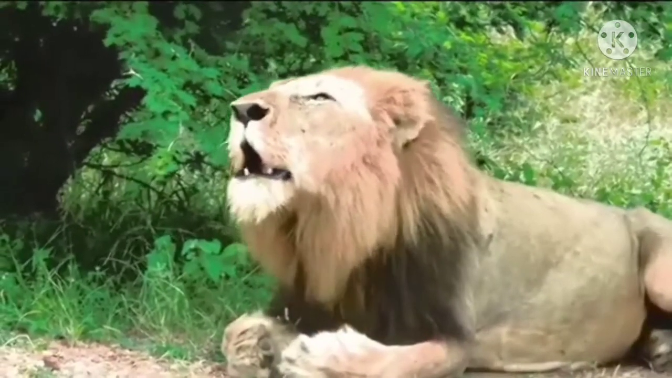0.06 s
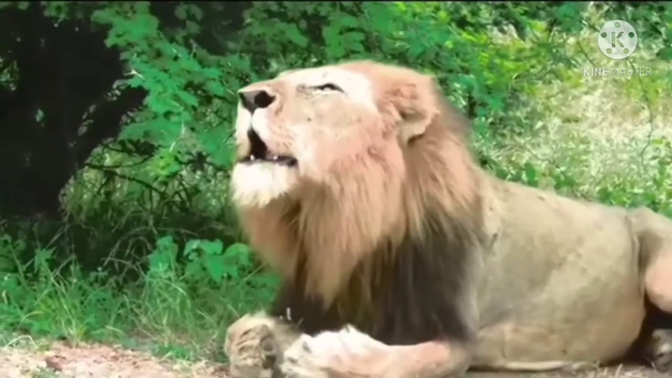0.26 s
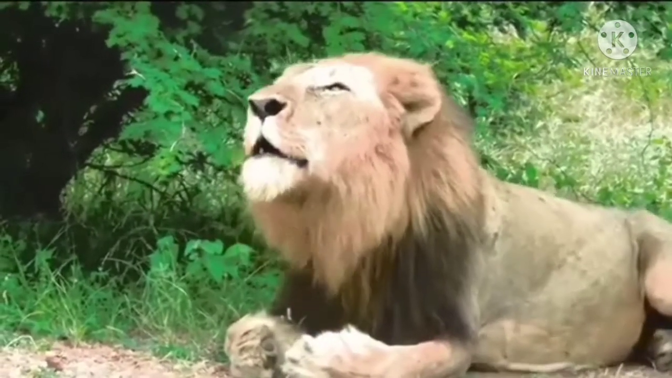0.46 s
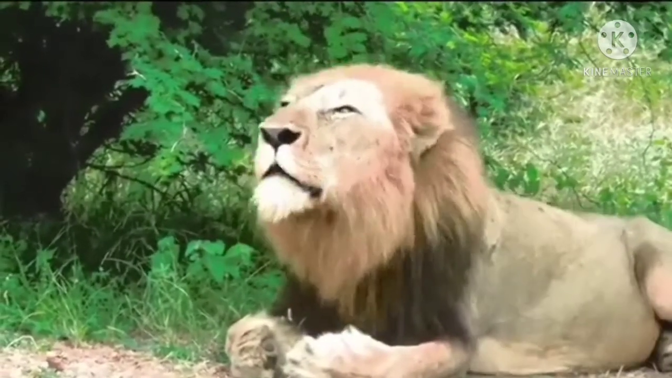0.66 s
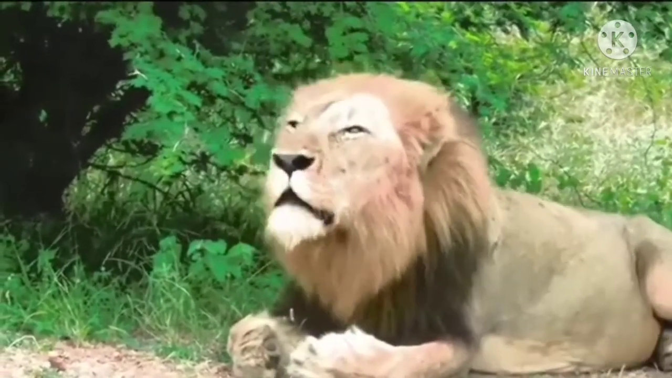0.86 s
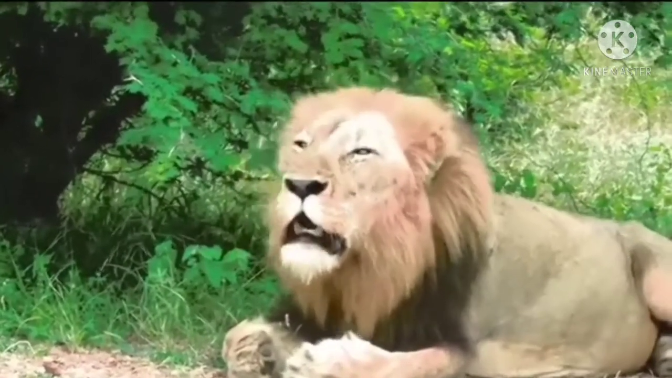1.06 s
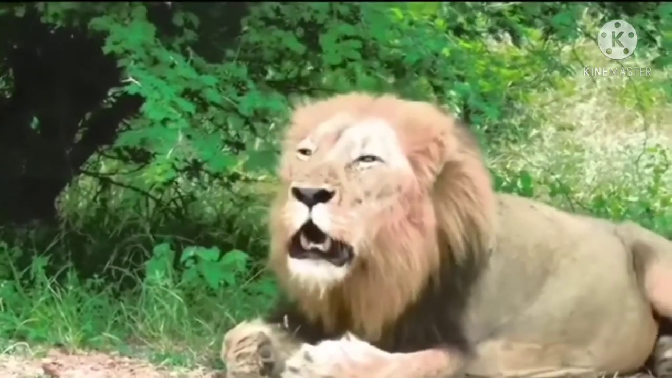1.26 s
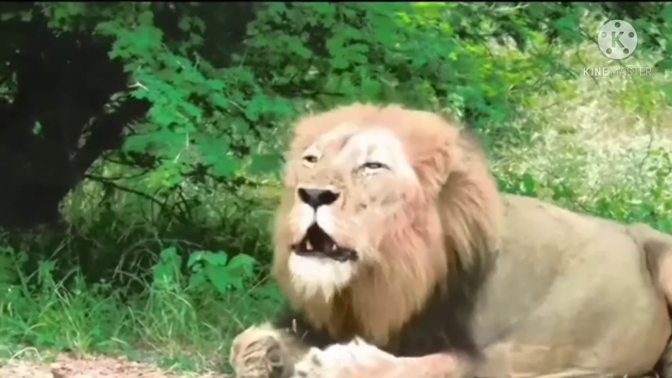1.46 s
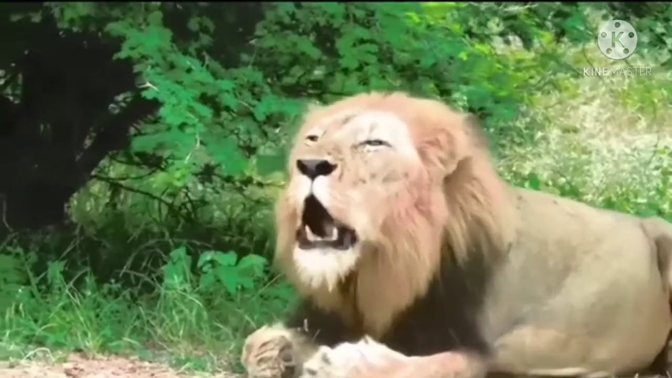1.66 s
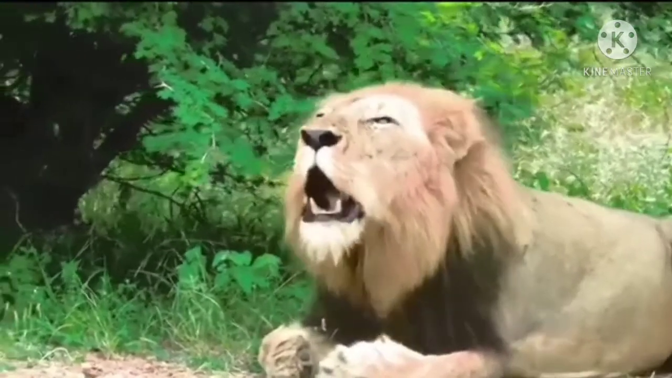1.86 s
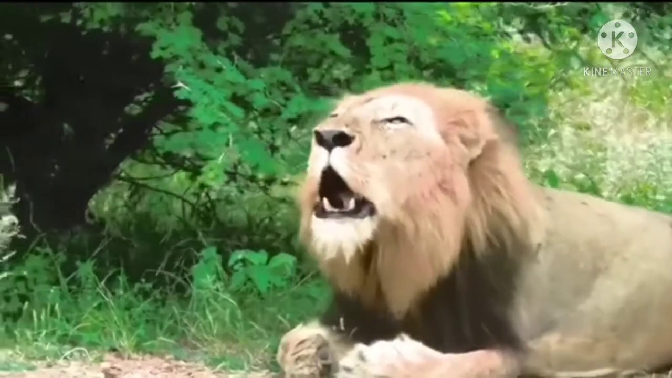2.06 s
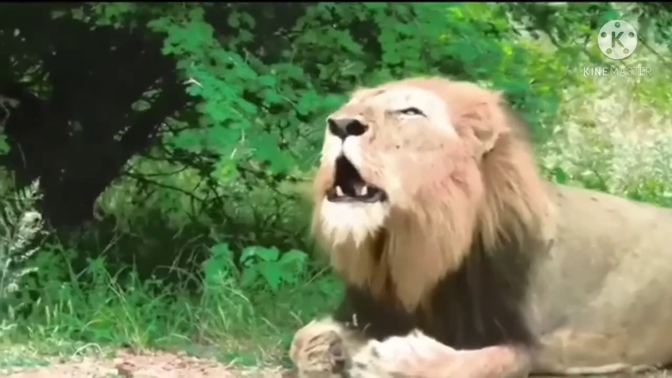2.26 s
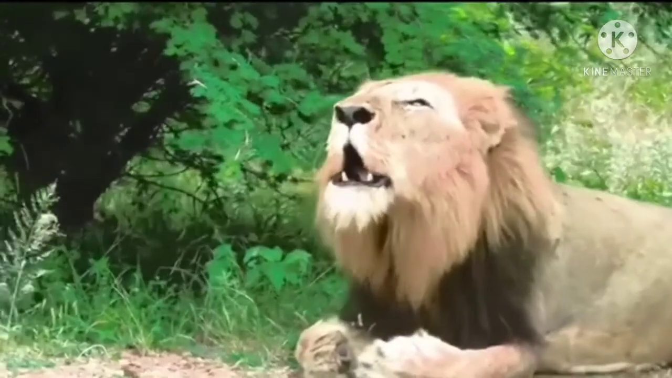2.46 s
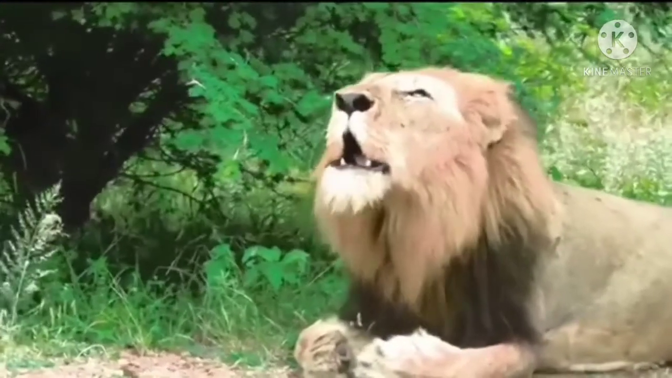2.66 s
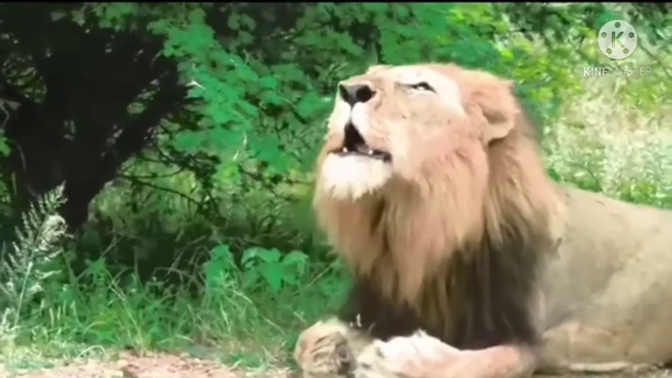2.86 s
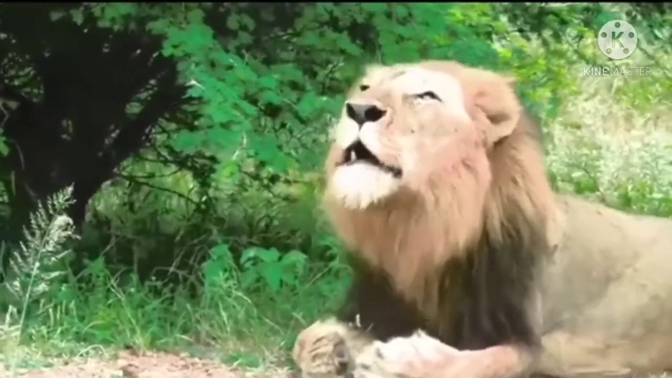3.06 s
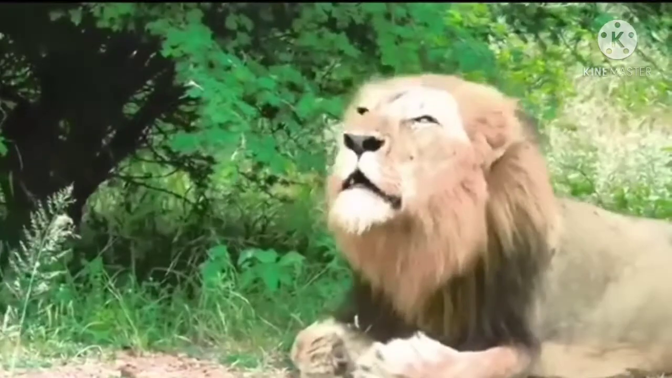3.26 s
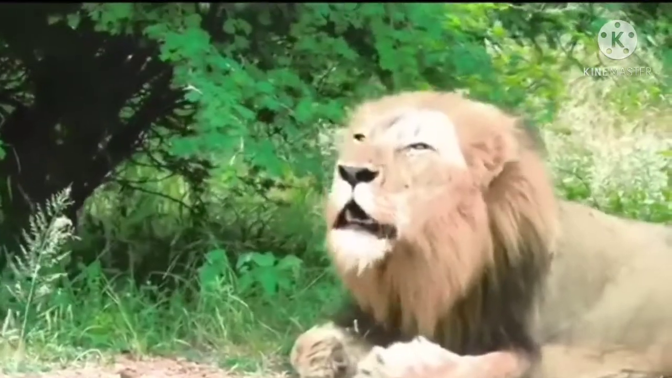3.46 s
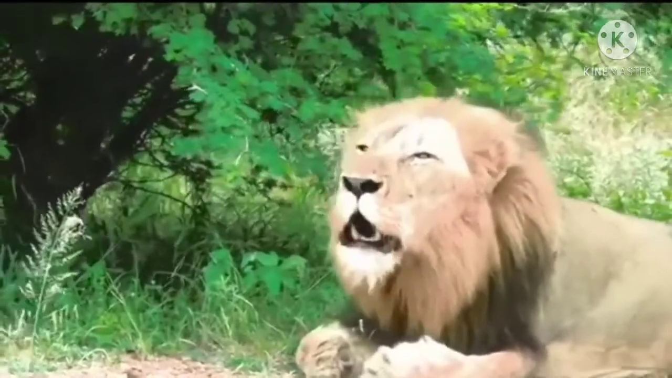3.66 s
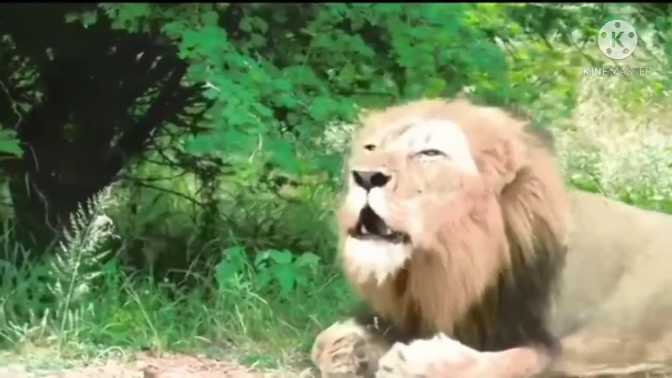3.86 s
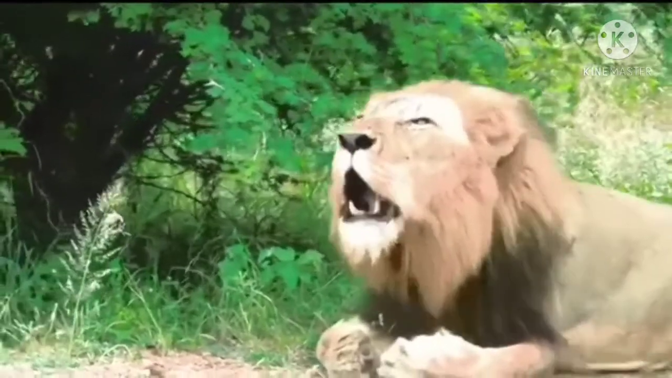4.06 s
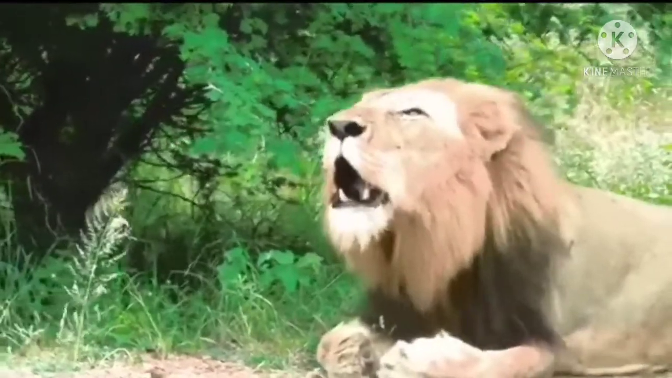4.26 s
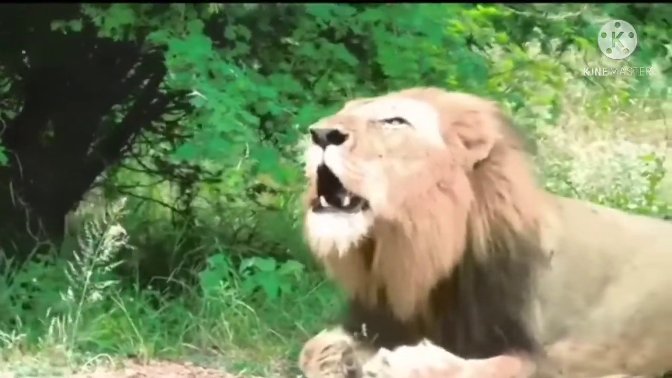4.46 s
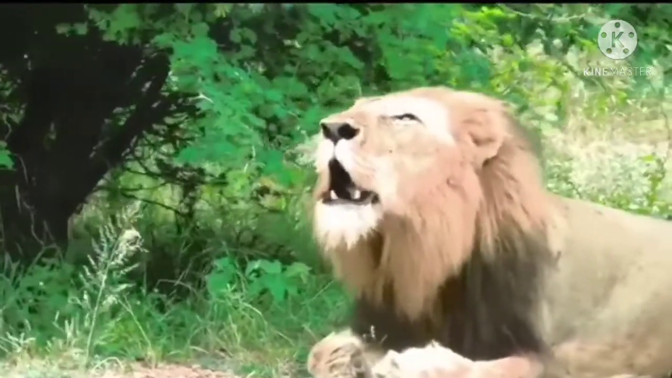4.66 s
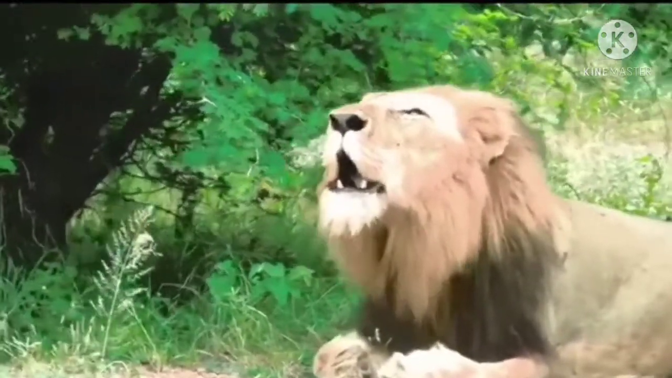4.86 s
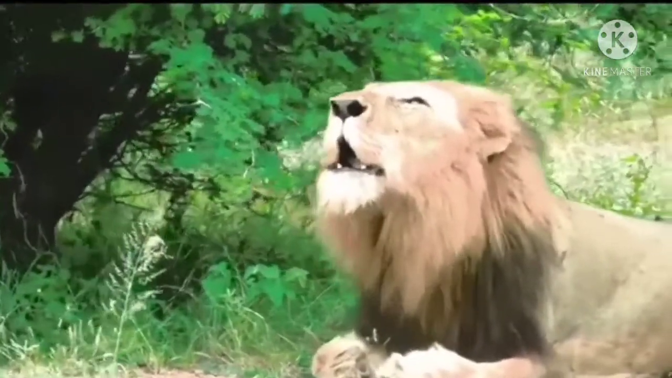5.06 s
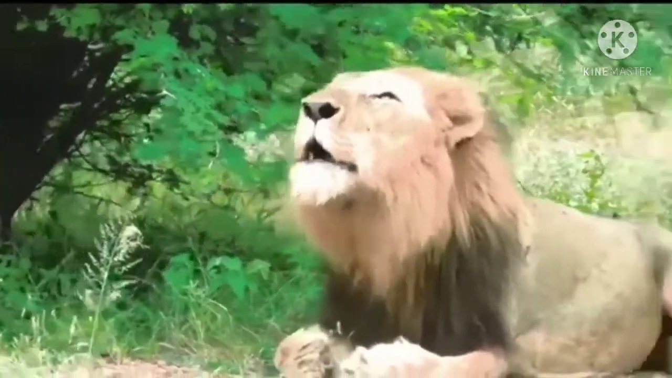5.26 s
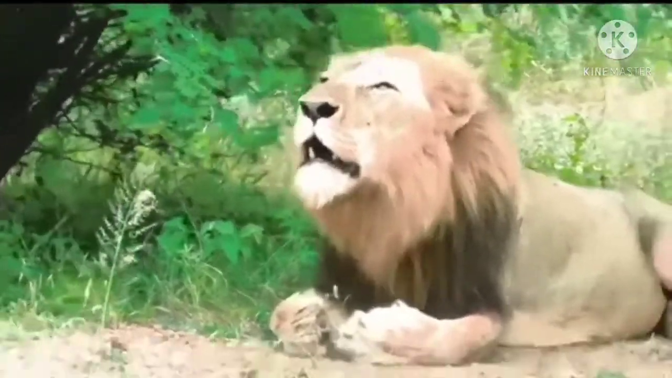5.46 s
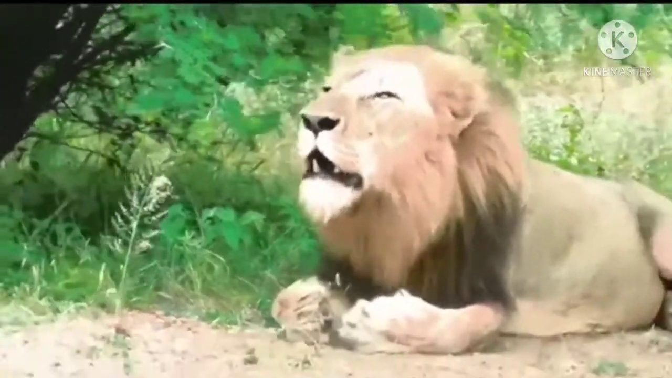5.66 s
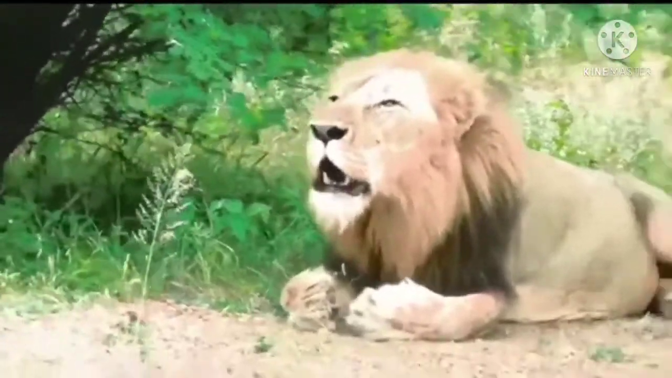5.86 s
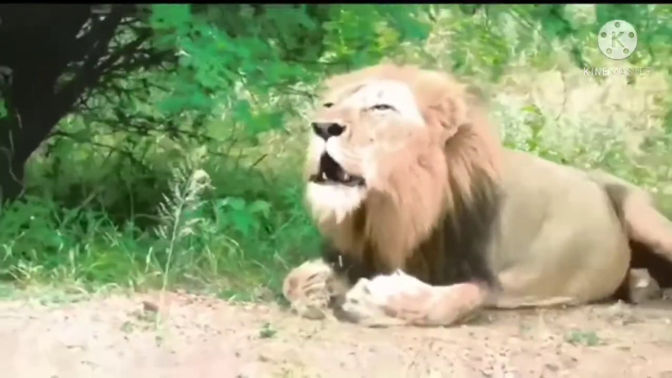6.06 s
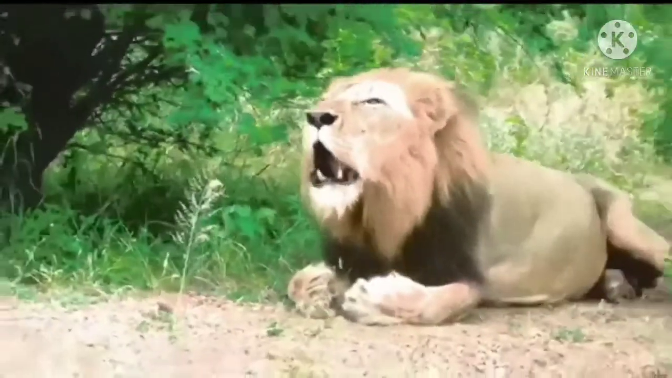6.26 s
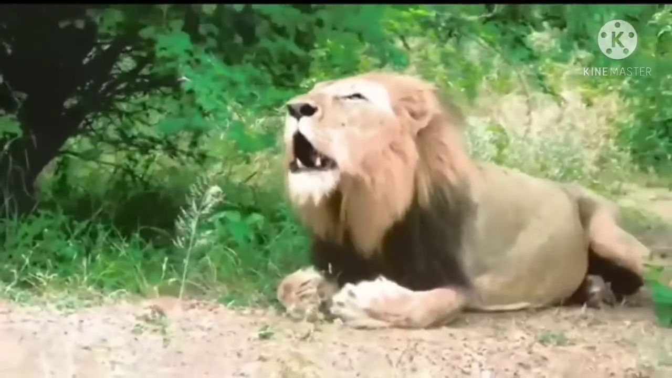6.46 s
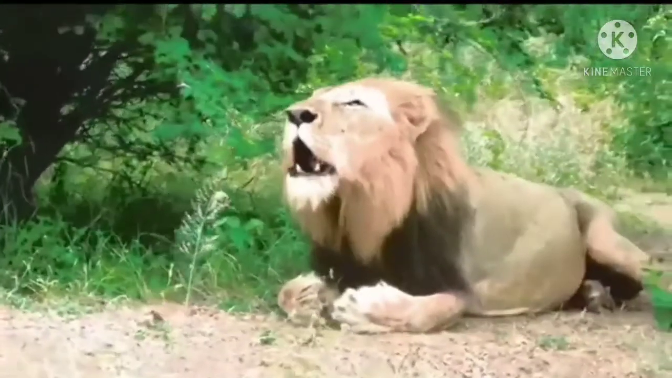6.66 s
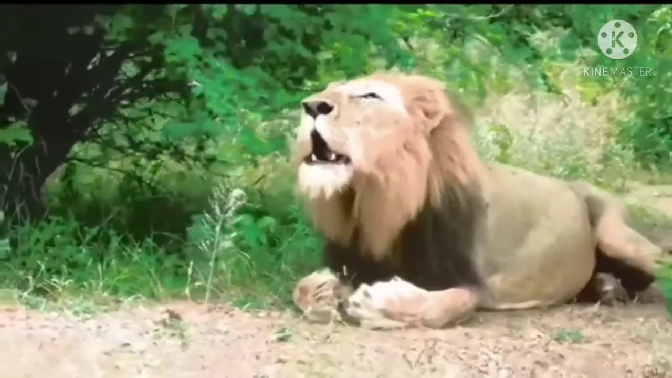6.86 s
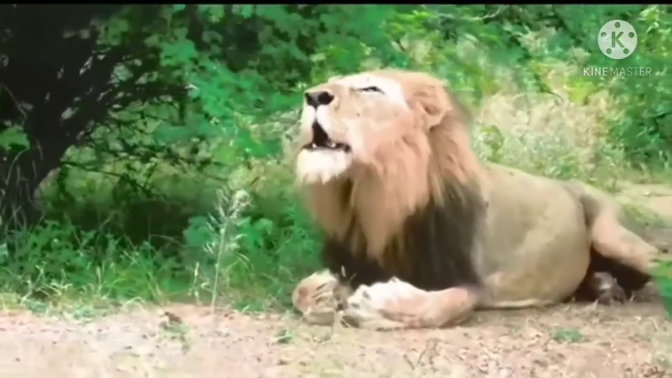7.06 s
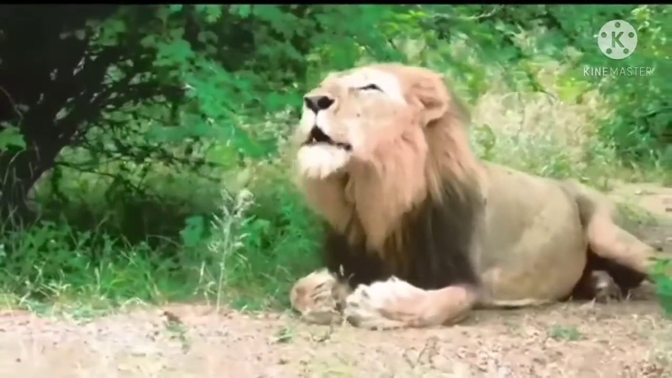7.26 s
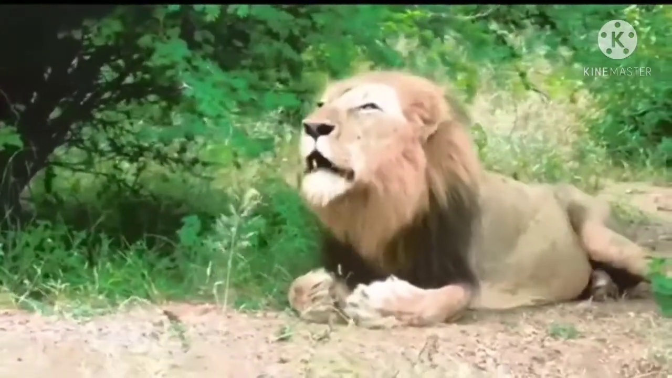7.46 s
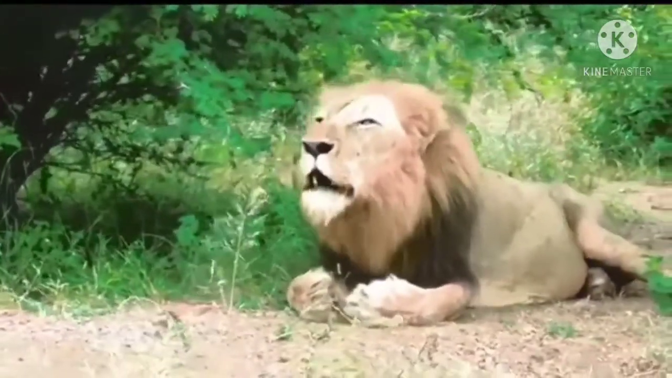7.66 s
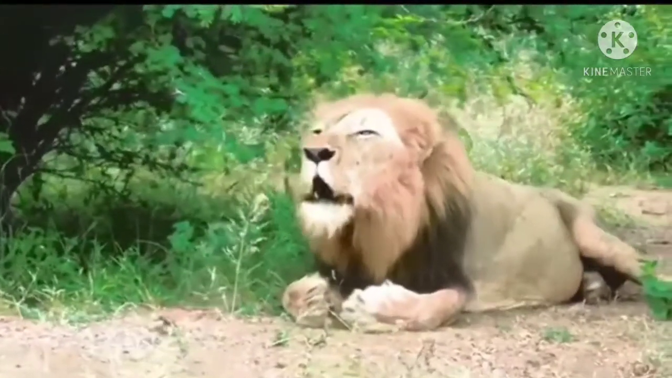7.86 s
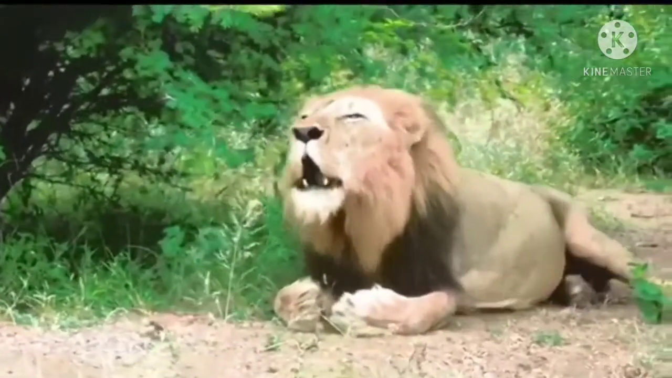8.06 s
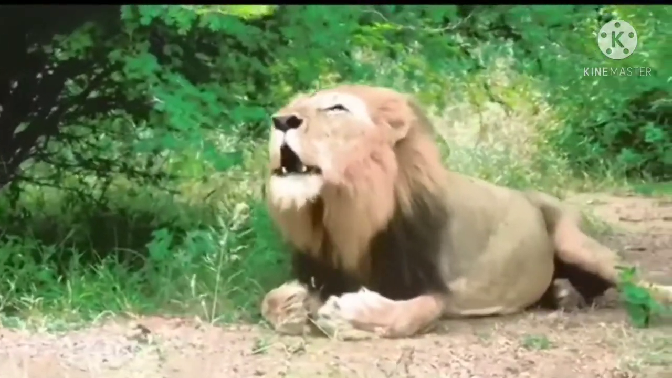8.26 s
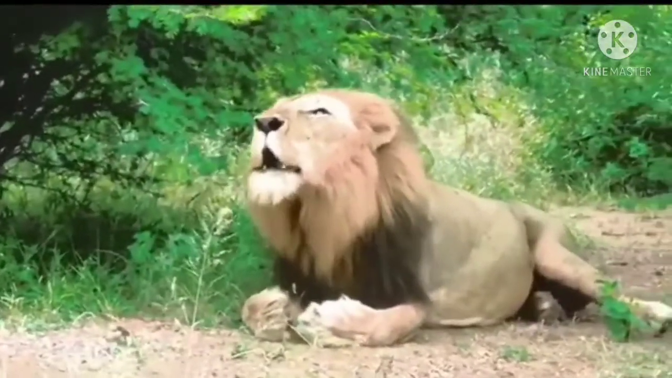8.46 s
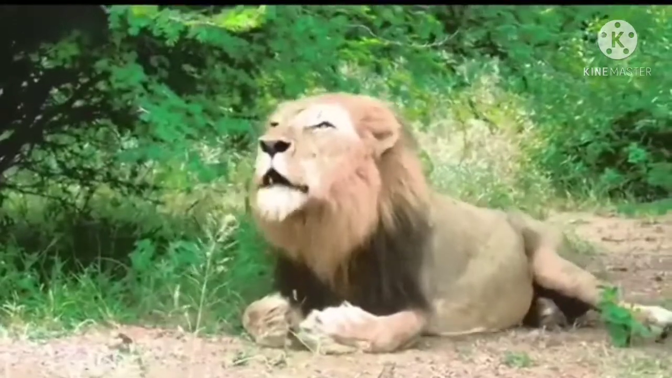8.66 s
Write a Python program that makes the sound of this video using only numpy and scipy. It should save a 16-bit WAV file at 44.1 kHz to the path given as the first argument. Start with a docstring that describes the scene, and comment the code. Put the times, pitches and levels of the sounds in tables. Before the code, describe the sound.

Deep lion roars, five in nine seconds, each moan ending in a throaty growl, over bright birdsong, faint rustling leaves and soft hiss.

```python
"""Lion roaring in a clearing

A male lion roars five times, the first already under way: a clear moan breaks into a growl as the throat
rattles. The voice is harmonics on the fold pitch, plus ragged thirds of it, through throat and mouth bands.
Near and far birds are gliding sines and buzzing trills, smeared by noise tails scattered from the trunks.
Leaves, air and microphone hiss are coloured noise, with a few rustles and a low gust on top."""
import sys
import numpy as np
from scipy import signal
from scipy.fft import rfft, irfft, next_fast_len
from scipy.io import wavfile
from scipy.ndimage import uniform_filter1d

SR = 44100
rng = np.random.default_rng(int(sys.argv[2]) if len(sys.argv) > 2 else 0)


def master(y):
    """Save y as 16-bit WAV."""
    cut = np.clip(np.atleast_2d(y).T, -1, 1)
    pcm = np.round(cut * 32767)  # scale
    wavfile.write(sys.argv[1], SR, pcm.astype(np.int16))


N = 384552  # length in samples


def undb(db):
    """Amplitude of a level in dB."""
    return 10 ** (np.asarray(db) / 20)


def unit(x):
    """Scale to rms 1."""
    return x / np.sqrt(np.mean(x ** 2))


def on_log(table, hz):
    """Read a (Hz, value) table on a log-frequency axis."""
    f, v = np.transpose(table)
    return np.interp(np.log(np.maximum(hz, 1)), np.log(f), v)


def resonance(hz, centre_hz, width_hz):
    """Gain of one resonance, 1 at its centre."""
    return 1 / np.sqrt(1 + ((hz - centre_hz ** 2 / np.maximum(hz, 1)) / width_hz) ** 2)


def shape(x, gain):
    """Filter by a gain given as a function of frequency."""
    n = next_fast_len(N + 8192)
    return irfft(rfft(x, n) * gain(np.arange(n // 2 + 1) * SR / n), n)[..., :N]


def walk(rate):
    """Random levels held 1 / rate s and slewed twice, drawn on a coarse grid; spread 1."""
    hop = 32  # samples per grid point
    k = int(SR / hop / rate)
    held = np.repeat(rng.standard_normal(N // (hop * k) + 2), k)
    coarse = unit(uniform_filter1d(uniform_filter1d(held, k), k))
    return np.interp(np.arange(N) / hop, np.arange(len(coarse)), coarse)


def blend(clear, rough, share):
    """Mix two sounds by their share of the power."""
    return np.sqrt(1 - share) * clear + np.sqrt(share) * rough


def echoes(x, t60_s, rise_s):
    """Scatter from many trunks: a fading noise tail of unit energy."""
    t = np.arange(SR) / SR
    tail = rng.standard_normal(SR) * np.exp(-np.log(1000) * t / t60_s) * np.minimum(t / rise_s, 1)
    return signal.fftconvolve(x, tail / np.sqrt(np.sum(tail ** 2)))[:N]


BED_DB = -47.5  # rms of the middle
# Colour of leaves, air and hiss. Each row: frequency in Hz, relative density in dB per Hz.
BED_COLOUR = [(20, -7.5), (26, -1.5), (31, 1.5), (41, -16.5), (52, -1.5), (80, -8.5), (130, -12.5),
              (300, -13), (600, -22), (1150, -11), (2500, -10.5), (5000, -14.5), (8000, -20), (15500, -30)]
# Width of the bed. Each row: frequency in Hz, side level in dB relative to the steady middle.
BED_SIDE = [(400, -42), (1500, -28), (5000, -31), (8000, -18), (12000, -0.5)]


def bed():
    """Leaves rustle in patches over steady air and hiss; the bass is alike in both ears, the treble less so."""
    colour = lambda f: undb(on_log(BED_COLOUR, f))
    steady = shape(rng.standard_normal(N), colour)
    patches = 0
    # each stretch of foliage swells on its own
    for hz in (1500, 2500, 4000, 6500, 10000):
        swell = undb(1.4 * walk(8)) - 1
        patches = patches + swell * shape(steady, lambda f: resonance(f, hz, .6 * hz) ** 2)
    mid = steady + patches
    side = shape(rng.standard_normal(N), lambda f: colour(f) * undb(on_log(BED_SIDE, f)))
    return undb(BED_DB) * np.array([mid + side, mid - side]) / np.sqrt(np.mean(mid ** 2))


# Brief rustles and a low gust on the microphone. Each row: middle in seconds, time from there until the
# swell falls to 1/e in seconds, centre in Hz, resonance width before squaring in Hz, peak level in dB.
RUSTLES = [(0.04, 0.019, 5950, 7000, -43.5), (1.167, 0.13, 67.5, 24.5, -53.5),
           (4.629, 0.022, 11000, 6070, -50), (5.579, .02, 9000, 6000, -69)]


def rustles():
    """Short swells of noise in one broad band each."""
    t = np.arange(N) / SR
    out = 0
    for at, length, hz, width_hz, db in RUSTLES:
        noise = unit(shape(rng.standard_normal(N), lambda f: resonance(f, hz, width_hz) ** 2))
        out = out + undb(db) * np.exp(-((t - at) / length) ** 4) * noise
    return out


def whistle(notes):
    """Each note is a sine that glides to its bend and on to its end; one that turns back does so in an arch."""
    out = np.zeros(N + SR)
    for start, first, second, hz0, hz1, hz2, db in notes:
        t = np.arange(int((first + second) * SR)) / SR
        if (hz1 - hz0) * (hz2 - hz1) < 0:
            curve, rise, fade = 1.7, .008, .5
        else:
            curve, rise, fade = 1, .6 * first if hz1 < hz0 else .005, 1.2
        before, after = np.clip(1 - t / first, 0, 1), np.clip((t - first) / second, 0, 1)
        hz = hz1 + (hz0 - hz1) * before ** curve + (hz2 - hz1) * after ** curve
        hz = uniform_filter1d(hz, size=200)
        # a quick swell at the start, fading through the last glide
        swell = np.minimum(t / rise, 1) * (1 - after) ** fade
        i = int(start * SR)
        out[i:i + len(t)] += np.sqrt(2) * undb(db) * swell * np.sin(2 * np.pi * np.cumsum(hz) / SR)
    return out[:N]


CHORUS_PER_S, CHORUS_HZ, CHORUS_DB = 90, 2900, -62  # notes a second, usual pitch, usual level before the wood


def chorus():
    """Far birds: many short notes at chance times and pitches."""
    count = int(CHORUS_PER_S * N / SR)
    even, bell = rng.random((count, 3)).T, rng.standard_normal((count, 4)).T
    start, first, second = even[0] * N / SR, 0.0093 + .03 * even[1], 0.016 + 0.051 * even[2]
    hz = np.clip(CHORUS_HZ * np.exp(.33 * bell[0]), 1300, 7000)
    start_hz, end_hz = hz * np.exp(.12 * bell[1]), hz * np.exp(.12 * bell[2])
    return whistle(zip(start, first, second, start_hz, hz, end_hz, CHORUS_DB + 3 * bell[3]))


# Buzzing trills. Each row: start in seconds, end in seconds, low pitch in Hz, usual high pitch in Hz,
# mean sweeps a second, usual level in dB before the wood.
TRILLS = [(1.23, 1.722, 3630, 4215, 60, -49.5), (2.345, 2.497, 3720, 4300, 60, -45.5),
          (7.697, 8.125, 3640, 4350, 60, -45.5), (1.24, 1.34, 3600, 3900, 90, -45),
          (1.22, 1.33, 2750, 3050, 90, -51), (4.22, 4.325, 3700, 4000, 90, -45),
          (4.22, 4.32, 2950, 3250, 90, -48), (6.205, 6.325, 3700, 4000, 90, -44),
          (6.205, 6.32, 3000, 3300, 90, -48)]


def trills():
    """A whistle swept up and down so fast and unevenly that it buzzes, lingering at the low end."""
    t, out = np.arange(N) / SR, 0
    for start, end, low_hz, high_hz, rate, db in TRILLS:
        sweep = np.sin(np.pi * np.cumsum(rate * (1 + 0.23 * walk(40))) / SR) ** 4
        gate = np.clip(np.minimum(t - start, end - t) / 0.03, 0, 1)
        level = gate * undb(db + 2.5 * walk(50))
        hz = low_hz + (high_hz - low_hz) * sweep * (1 + .2 * walk(30))
        out = out + level * np.sin(2 * np.pi * np.cumsum(hz) / SR)
    return out


# The nearest bird glides down, then plunges. Each row: start in seconds, glide in seconds, plunge in seconds,
# start pitch in Hz, bend pitch in Hz, end pitch in Hz, level in dB before the wood.
SONG = [(0.864, .074, .01, 7550, 5950, 3800, -33), (1.02, .056, .01, 7050, 6100, 2900, -32),
        (1.14, .026, .038, 6020, 5760, 2950, -32), (3.84, .068, .018, 7400, 6250, 4500, -35.5),
        (3.99, .047, .01, 7270, 6170, 3600, -32.5), (4.12, .03, .025, 6280, 5720, 3230, -36),
        (5.96, .064, .012, 7226, 6200, 5130, -35.5), (6.09, .055, .014, 6720, 5820, 3550, -33)]
# Other calls, by kind. Each kind: time to the bend in seconds, time after it in seconds, start and end pitch
# as ratios to the bend; then its notes, each row: start in seconds, bend pitch in Hz, level in dB before the wood.
CALLS = { "arch": ((.027, .052, .81, .8), [ (1.76, 5830, -44.5), (1.95, 5740, -43.5), (2.135, 5790, -44),
         (2.315, 5570, -45), (2.5, 5460, -44.5), (7.64, 5600, -50), (8.16, 5720, -41.5), (8.34, 5700, -40),
         (8.525, 5666, -40.5), (8.7, 5620, -45)]), "shallow arch": ((0.017, .03, 0.92, .94),
         [ (1.87, 3520, -49), (2.05, 3483, -51), (2.23, 3382, -50), (2.61, 3470, -45.5), (4.875, 3989, -45),
         (8.152, 3600, -48)]), "steep arch": ((.009, .024, .68, .64), [(8.625, 4160, -37.5)]),
         "long level note": ((.04, .052, .95, .96), [ (2.69, 6750, -57), (3.07, 3750, -54),
         (3.78, 4800, -55), (5.7, 4580, -57), (6.7, 5800, -54.5), (7.33, 6750, -57), (8.01, 6790, -57)]),
         "upslur": ((.02, .036, .83, 1.13), [ (2.39, 3460, -41), (2.525, 3760, -42.5), (2.66, 3780, -43),
         (2.775, 3644, -43), (2.9, 3590, -49), (5.49, 3760, -46), (6.87, 4180, -48.5), (7.77, 3560, -42),
         (7.9, 3730, -43), (8.03, 3660, -43.5)]), "downslur": ((.025, 0.035, 1.1, .9), [ (.255, 6790, -51),
         (.3, 3890, -47.5), (1.805, 6796, -46.5), (2.905, 7000, -50), (3.81, 6350, -45.5),
         (4.585, 6700, -48.5), (4.63, 4400, -55), (4.875, 3163, -48.5), (6.285, 7090, -43),
         (7.69, 6800, -52), (7.71, 3940, -45.5), (7.85, 3800, -48)]), "chip": ((.011, .018, 1.07, .9),
         [ (.32, 7240, -49), (4.668, 7140, -54), (6.445, 7260, -46.5), (7.345, 3200, -51),
         (7.415, 6040, -49), (8.27, 3250, -46), (8.348, 3420, -38), (8.387, 3720, -38), (8.46, 3300, -45)]),
         "low peep": ((0.0234, .045, 1.08, .96), [ (.72, 2400, -52), (3.8, 2180, -54), (4.49, 2200, -52),
         (5.34, 2248, -51), (5.57, 2200, -50.5), (5.95, 2095, -49), (6.28, 2192, -47.5),
         (6.64, 2322, -50.5), (7.365, 2010, -53), (7.765, 2000, -50)])}


def near_birds():
    """Near birds whistle: the plunging song and calls that bend once."""
    notes = list(SONG)
    for (first, second, up, down), rows in CALLS.values():
        notes += [(s, first, second, hz * up, hz, hz * down, db) for s, hz, db in rows]
    return whistle(notes)


# The roars. Each row: start in seconds, break in seconds, end in seconds; the first is already under way.
ROARS = [(-.7, .192, .536), (1.71, 2.754, 3.04), (4.074, 5.032, 5.302), (6.306, 7.092, 7.335),
         (8.154, 8.4, 8.675)]
# Every roar opens, breaks and closes alike. Each row of the next four tables: time in seconds, pitch in Hz,
# then levels in dB of fundamental, throat band, pharynx band and mouth band, before they waver.
# Opening, timed from the start: the fundamental dips as the pitch jumps up.
OPENING = [(-.07, 112, -56, -68, -82, -75), (-.036, 120, -39, -46, -58, -62), (0, 133, -24, -35, -46, -48),
           (.032, 146, -21.5, -38, -45, -47), (.065, 156, -16.5, -29.5, -55, -49),
           (.108, 170, -23, -25, -50, -44), (.128, 184, -27, -25, -48, -42),
           (.155, 197.1, -19, -29, -45, -45)]
# The moan between opening and break, one table a roar in scene time; the last stays low.
MOANS = [
    [(0, 177, -16, -40, -42, -45), (.046, 177, -18, -30, -56, -52), (.106, 173, -17.5, -29, -53, -42)],
    [(1.914, 208, -34, -27.5, -47, -40), (1.99, 196, -34, -31.5, -55, -47.5),
     (2.056, 203, -29, -33.5, -55, -46.5), (2.136, 186, -33.5, -28.5, -58, -52.5),
     (2.208, 207, -21, -33.5, -45, -38), (2.328, 207, -16.5, -31, -43, -39.5),
     (2.42, 197, -18, -27.5, -50, -46), (2.562, 184, -15, -39, -41, -41.5)],
    [(4.27, 195, -26.5, -27, -48, -39), (4.326, 193, -25.5, -25.5, -54, -44.5),
     (4.358, 199, -27, -35.5, -55, -51), (4.626, 202.6, -17.5, -35, -50, -45),
     (4.736, 198, -17.5, -29.5, -47, -45), (4.864, 189, -16, -34, -41, -42.5)],
    [(6.48, 195, -20, -25, -41, -42), (6.536, 197, -19.5, -27, -43, -46),
     (6.758, 198, -17.5, -26, -45, -47), (6.878, 189, -18.5, -29, -42, -44),
     (6.978, 174, -16.5, -33, -46, -49)],
    [(8.192, 144, -17.5, -36, -41, -49), (8.248, 150, -16.5, -28.5, -49, -46),
     (8.356, 150, -19.5, -33, -46, -48), (8.45, 131, -27.5, -31, -44, -48),
     (8.506, 130, -21, -35.5, -50, -45)],
]
# Break, timed from the break: the pitch drops into the growl.
BREAK = [(-.05, 175, -20.5, -27, -52, -43), (0, 147, -24, -31, -45, -40), (.04, 143, -20, -35, -48, -44)]
# Closing, timed from the end of the roar.
CLOSING = [(-.15, 135, -20, -33, -54, -42), (-.085, 131.1, -19, -38, -46, -46),
           (-.03, 120, -21.5, -37.5, -53, -46), (0, 110.9, -27, -43, -60, -51),
           (.03, 112, -50, -60, -72, -66), (.1, 112, -53, -66, -75, -66)]


def roar_curves():
    """Opening, moan, break and closing joined into one table a roar."""
    moved = lambda rows, at: [(at + s, *rest) for s, *rest in rows]
    tables = []
    for (start, turn, end), moan in zip(ROARS, MOANS):
        opening = [r for r in moved(OPENING, start) if r[0] < moan[0][0]]
        breaking = [r for r in moved(BREAK, turn) if r[0] > moan[-1][0]]
        tables.append(opening + moan + breaking + moved(CLOSING, end))
    return tables


CLEAR_SHARE, GROWL_SHARE = .045, .68  # rattle in the moan and after the break, 0-1
GROWL_LEAD_S, GROWL_FADE_S = .03, .08
# Rattling besides the growl after each break. Each row: from in seconds, to in seconds, share of rattle 0-1.
RATTLES = [(1.82, 2.17, .7), (2.2, 2.43, .16), (4.2, 4.35, .6), (4.48, 4.74, .13), (6.42, 6.49, .3),
           (6.6, 6.82, .09), (8.1, 8.45, .62)]


def growl_curve(t):
    """How much the throat rattles, slewed between clear and growling stretches."""
    growl = np.full(N, CLEAR_SHARE)
    breaks = [(turn - GROWL_LEAD_S, end + .15, GROWL_SHARE) for _, turn, end in ROARS]
    for a, b, share in breaks + RATTLES:
        growl[(t >= a) & (t < b)] = share
    return uniform_filter1d(growl, size=int(GROWL_FADE_S * SR))


LIPS_HZ, LIPS_WIDE_HZ = 963, 1264  # lip resonance, usual and parted
WIDE_FROM_HZ, WIDE_AT_HZ = 186, 195.3  # fold pitches over which the lips part
LIPS_SHUT_HZ, LIPS_CLOSE_S = 760, .14


def lips_curve(t, hz):
    """The lips part at the highest pitches; as each roar ends they close and their resonance sinks."""
    lips_hz = np.interp(hz, [WIDE_FROM_HZ, WIDE_AT_HZ], [LIPS_HZ, LIPS_WIDE_HZ])
    for _, _, end in ROARS:
        closing = (t > end - LIPS_CLOSE_S) & (t < end + .2)
        lips_hz[closing] = np.interp(t[closing], [end - LIPS_CLOSE_S, end - .04], [LIPS_HZ, LIPS_SHUT_HZ])
    return lips_hz


def partials(phase, hz, orders, gain, smear, waver_db):
    """Partials weighted by a resonance curve, rms near 1; each drifts in phase and level as the folds lose step."""
    tone, power = 0, 0
    for k in orders:
        weight = gain(k * hz)
        level = weight * undb(waver_db * walk(18))
        tone = tone + level * np.sin(k * phase + 2 * np.pi * rng.random() + smear * walk(50))
        power = power + weight ** 2
    return tone * np.sqrt(2 / power)


LIPS_WIDTH_HZ = 230  # before squaring
MOUTH_TOP_HZ = 1560  # little passes above the highest cavity
# Steady mouth cavities. Each row: centre in Hz, resonance width before squaring in Hz,
# level in dB relative to the lips with the jaw open.
MOUTH = [(905, 190, -3.5), (1047, 100, -13), (1374, 243, -2.5)]


def mouth_gain(f, lips_hz, shut):
    """Steady cavities, dulled as the jaw closes, beside the moving lip resonance."""
    power = resonance(f, lips_hz, LIPS_WIDTH_HZ) ** 4
    for centre_hz, width_hz, db in MOUTH:
        open_db = db - 11.3 * shut * (centre_hz / 1400) ** 2
        power = power + (undb(open_db) * resonance(f, centre_hz, width_hz) ** 2) ** 2
    return np.sqrt(power) / (1 + (f / MOUTH_TOP_HZ) ** 14)


THROAT_HZ, THROAT_WIDTH_HZ = 341.7, 109  # width before squaring
PHARYNX_HZ, PHARYNX_WIDTH_HZ = 575, 110  # width before squaring and before the growl broadens it
RING_HZ, RING_WANDER = 349, .05  # throat ring: mean pitch, spread as a share of it
BEAT_DB = -1.5  # difference tone of ring and folds relative to the ring, jaw closed
BREATHY = .27  # ragged share of the mouth band before the growl adds to it
FLICKER_DB = 2.5  # spread of the upper bands' flicker at full growl


def lion():
    """Clear harmonics on the fold pitch; in the growl, ragged thirds of it fill the gaps and the throat rings."""
    t = np.arange(N) / SR
    roars = roar_curves()
    s, *columns = np.transpose(np.vstack(roars))
    hz, voice_db, throat_db, pharynx_db, mouth_db = (np.interp(t, s, c) for c in columns)
    sounding = uniform_filter1d(sum((t >= r[0][0]) * (t <= r[-1][0]) * 1. for r in roars), size=800)
    growl = growl_curve(t)
    ring_hz = RING_HZ * (1 + RING_WANDER * walk(14))
    lips_hz = lips_curve(t, hz)
    flicker = lambda: undb(FLICKER_DB * growl * walk(16))
    jitter = (.004 + .01 * growl) * walk(40)
    phase = 2 * np.pi * np.cumsum(hz * (1 + jitter)) / SR
    # the jaw closes as the pitch sinks, which dulls the upper cavities
    shut = np.clip((196 - hz) / 55, 0, 1)
    # loose folds above the cords slap once in three cycles
    slap, slap_hz = phase / 3, hz / 3
    voice = np.sqrt(2) * np.sin(phase) * (1 + .1 * growl * np.cos(slap)) * undb((.2 + growl) * walk(35))

    def band(gain, low, high, share, smear, waver_db):
        """Blend clear harmonics with ragged thirds in one resonance."""
        clear = partials(phase, hz, range(low, high), gain, .3 * growl + .1, waver_db)
        rough = partials(slap, slap_hz, range(3 * low - 2, 3 * high - 2), gain, smear, waver_db)
        return blend(clear, rough, share)

    # the throat rings unsteadily at a pitch of its own and beats against the folds
    swing = 2 * np.pi * np.cumsum(ring_hz) / SR + .5 * walk(40)
    beat = undb(BEAT_DB) * (.2 + .8 * shut) * np.sin(swing - phase)
    ring = np.sqrt(2) * (np.sin(swing) + beat) * undb(3 * walk(45))
    throat_gain = lambda f: resonance(f, THROAT_HZ, THROAT_WIDTH_HZ) ** 2
    throat = blend(band(throat_gain, 2, 4, .8 * growl, .7, 1.), ring, .6 * growl)
    pharynx_gain = lambda f: resonance(f, PHARYNX_HZ, PHARYNX_WIDTH_HZ * (1 + .4 * growl)) ** 2
    pharynx = band(pharynx_gain, 3, 6, .05 + .6 * growl, .9, 2.5)
    ragged = np.clip(BREATHY + .55 * growl, 0, 1)
    mouth = band(lambda f: mouth_gain(f, lips_hz, shut), 4, 12, ragged, 1., 3.2)
    sound = undb(voice_db) * voice
    for db, layer in ((throat_db, throat), (pharynx_db, pharynx), (mouth_db, mouth)):
        sound = sound + undb(db) * flicker() * layer
    # little of the voice sounds below its lowest pitch
    return shape(sounding * sound, lambda f: 1 / np.sqrt(1 + (98 / np.maximum(f, 1)) ** 16))


DIRECT_DB = -1  # near birds sit behind leaves
TRUNKS_T60_S, TRUNKS_DB = .33, 1
WOOD_T60_S, WOOD_DB = .7, -7.5
CLEARING_T60_S, CLEARING_DB = 0.83, -24


def scene():
    """The bed, rustles, birds in the wood and the lion with the clearing's echo."""
    roar = lion()
    roar = roar + undb(CLEARING_DB) * echoes(roar, CLEARING_T60_S, 0.032)
    near, far = near_birds() + trills(), chorus()
    birds = near + far
    # near trunks answer at once, the deep wood later and longer
    trunks = undb(TRUNKS_DB) * echoes(birds, TRUNKS_T60_S, 0.0051)
    wood = undb(WOOD_DB) * echoes(birds, WOOD_T60_S, 0.095)
    return roar + undb(DIRECT_DB) * near + 0.44 * far + trunks + wood + rustles() + bed()


STEREO_FROM_HZ, TOP_HZ = 1400, 15550


def record(dry):
    """The right port hears one sample late, the bass is merged to the middle, the top is cut."""
    left, right = dry[0], np.append(0, dry[1][:-1])
    side = shape((left - right) / 2, lambda f: 1 / np.sqrt(1 + (STEREO_FROM_HZ / np.maximum(f, 1)) ** 8))
    both = (left + right) / 2 + np.array([side, -side])
    return signal.sosfilt(signal.ellip(10, .2, 80, TOP_HZ, fs=SR, output="sos"), both)


dry = scene()
out = record(dry)
master(out)
```